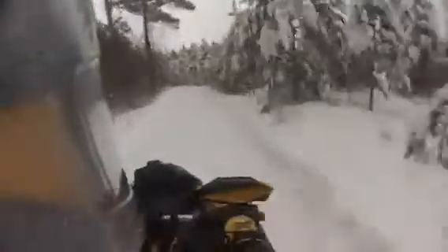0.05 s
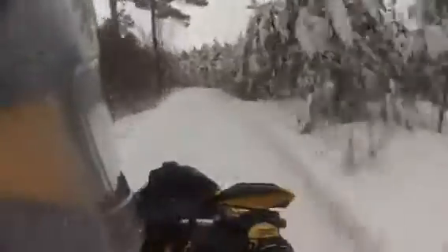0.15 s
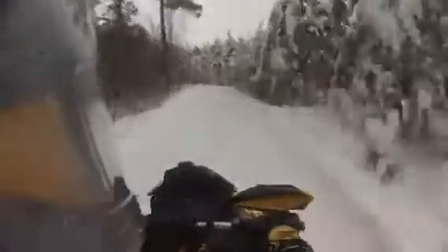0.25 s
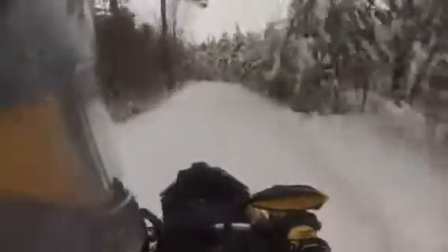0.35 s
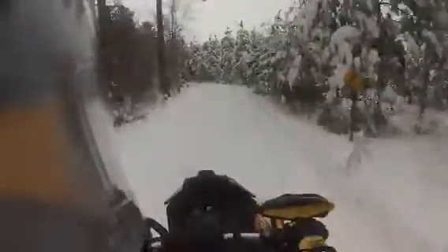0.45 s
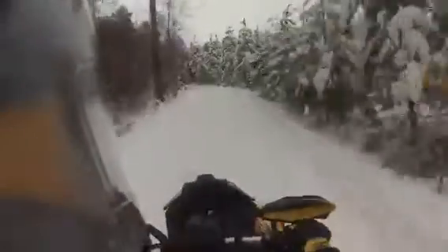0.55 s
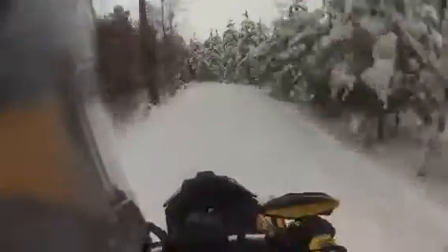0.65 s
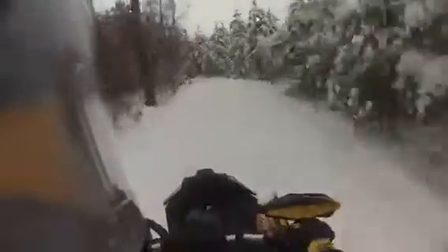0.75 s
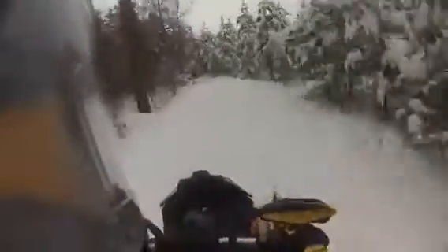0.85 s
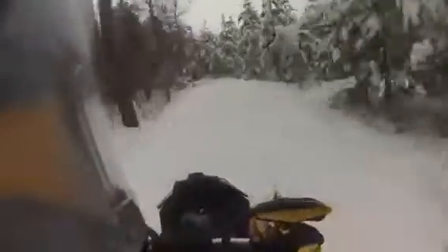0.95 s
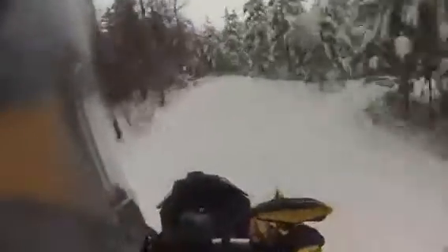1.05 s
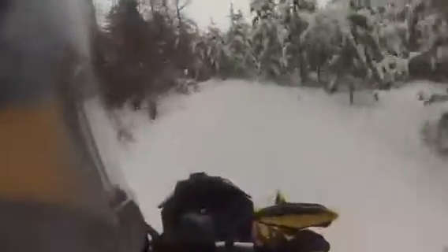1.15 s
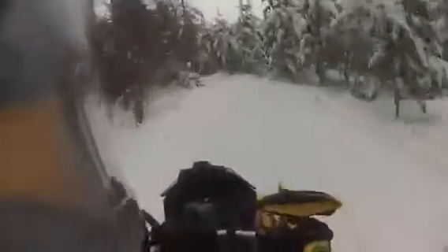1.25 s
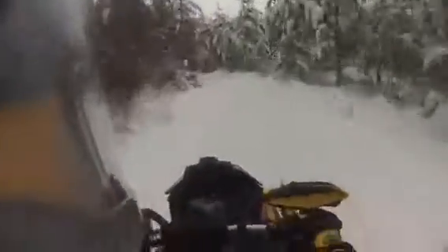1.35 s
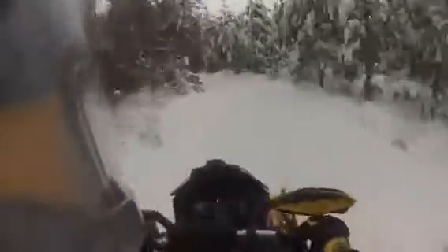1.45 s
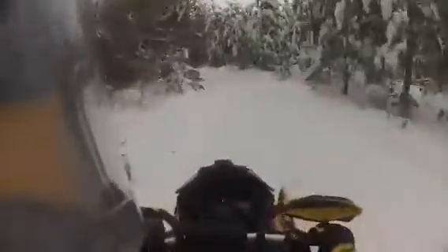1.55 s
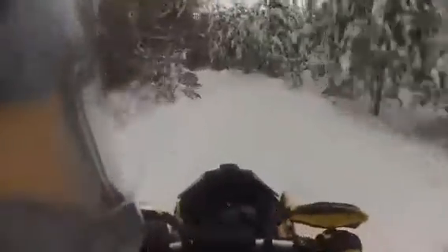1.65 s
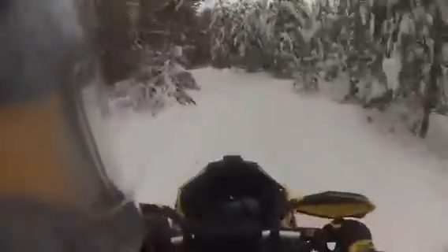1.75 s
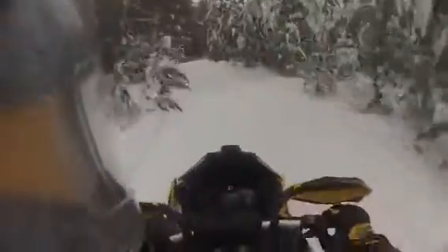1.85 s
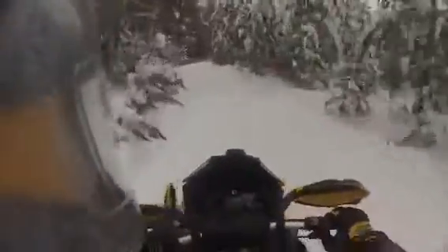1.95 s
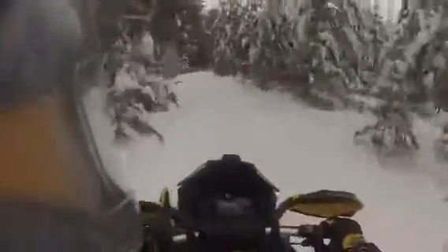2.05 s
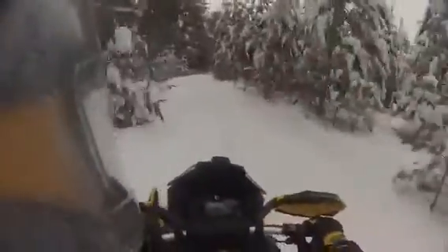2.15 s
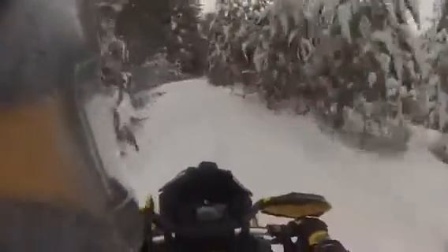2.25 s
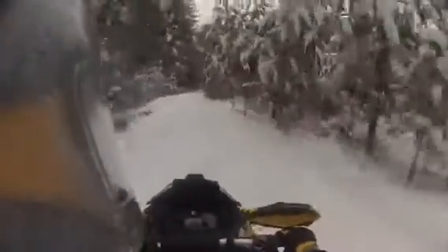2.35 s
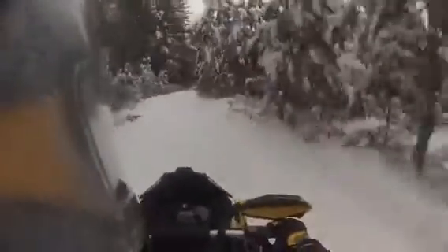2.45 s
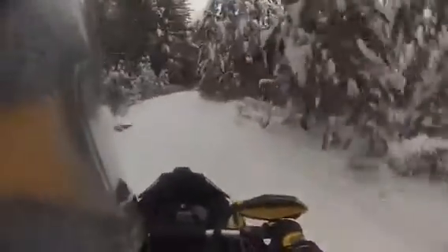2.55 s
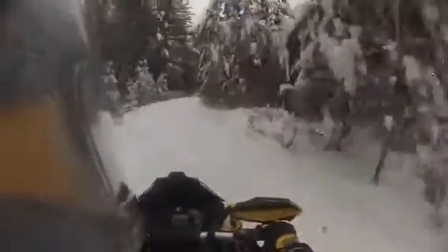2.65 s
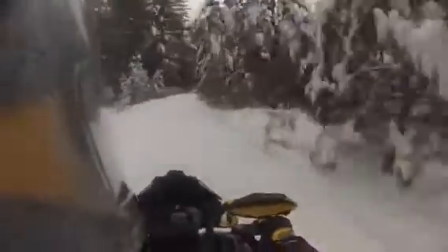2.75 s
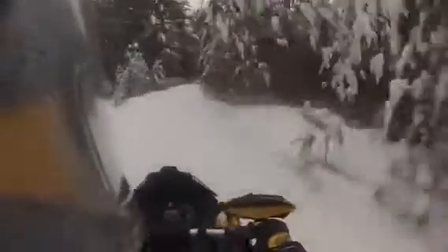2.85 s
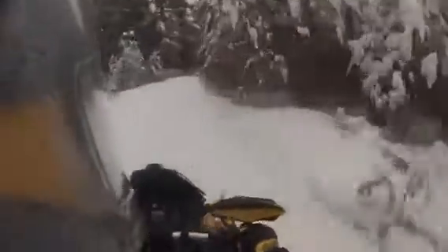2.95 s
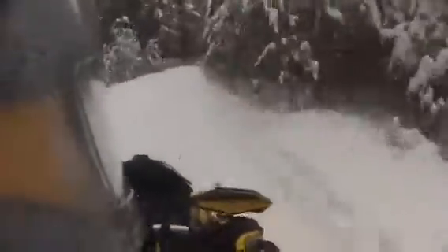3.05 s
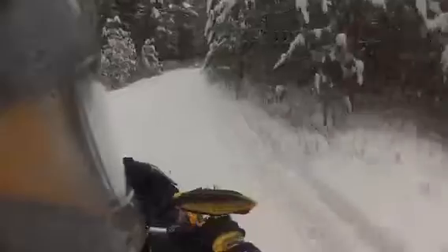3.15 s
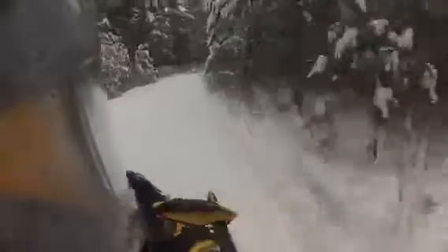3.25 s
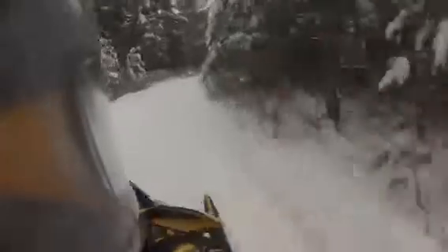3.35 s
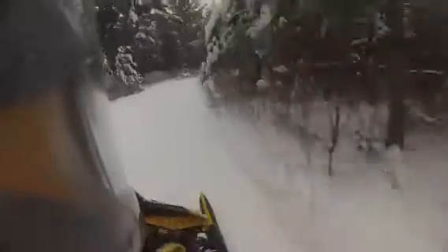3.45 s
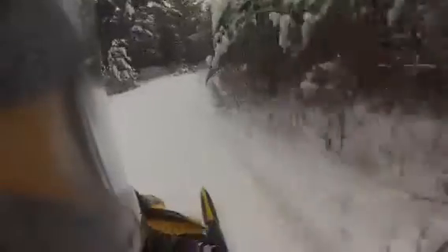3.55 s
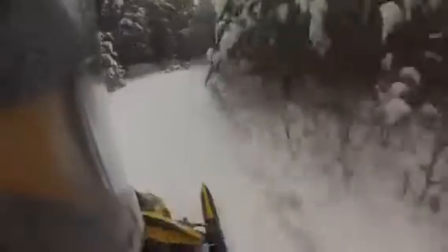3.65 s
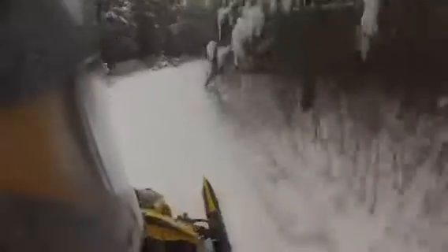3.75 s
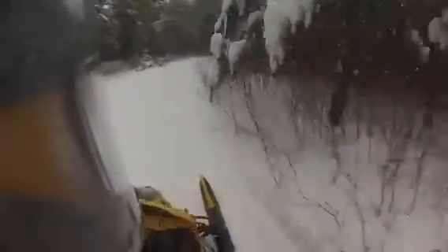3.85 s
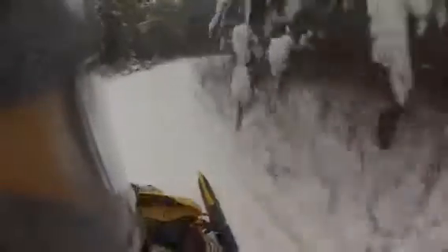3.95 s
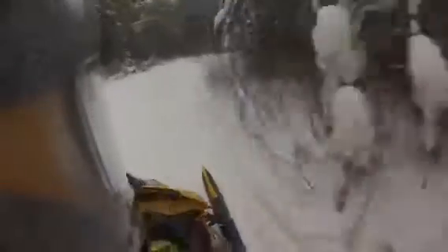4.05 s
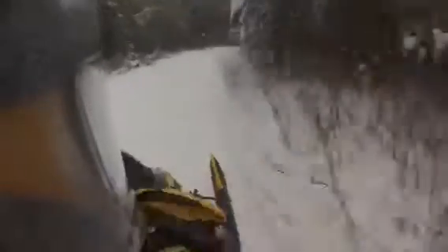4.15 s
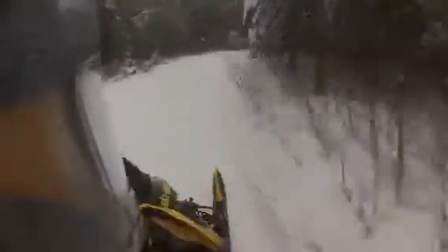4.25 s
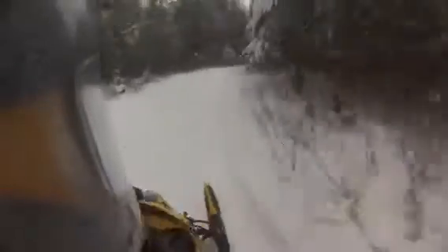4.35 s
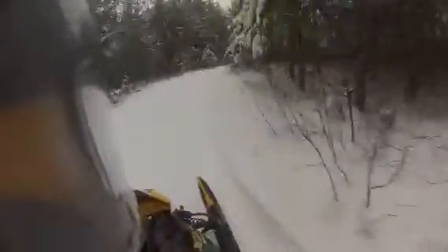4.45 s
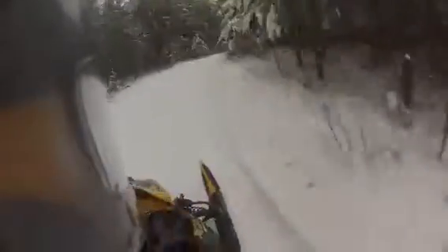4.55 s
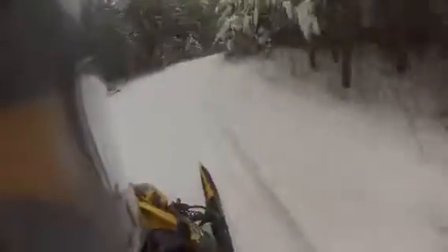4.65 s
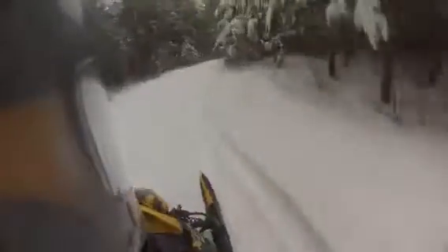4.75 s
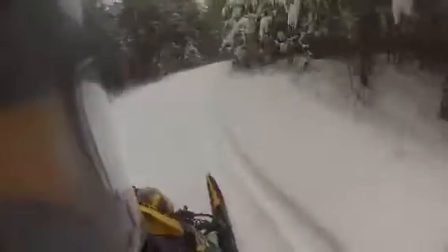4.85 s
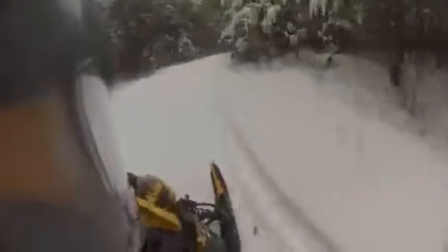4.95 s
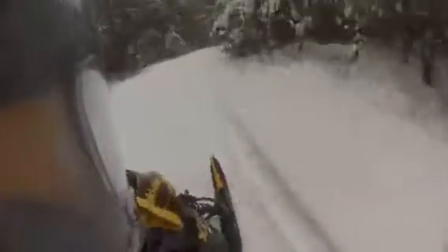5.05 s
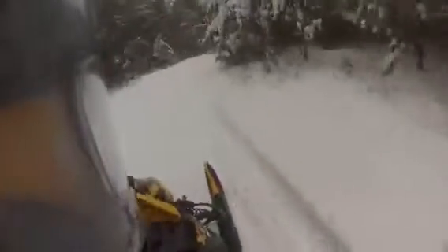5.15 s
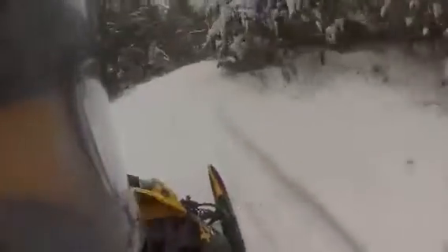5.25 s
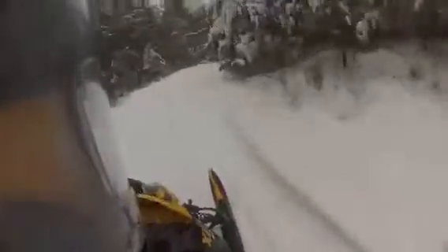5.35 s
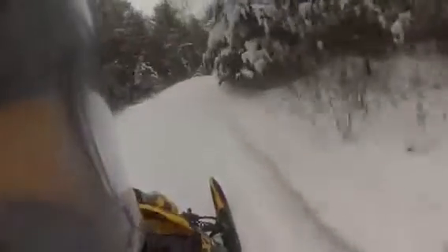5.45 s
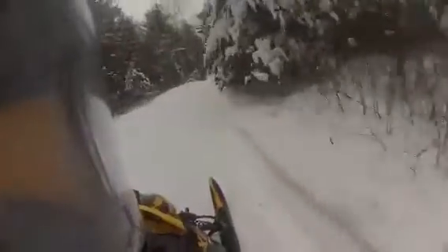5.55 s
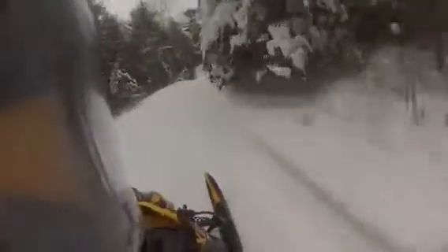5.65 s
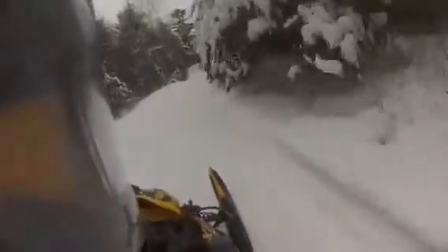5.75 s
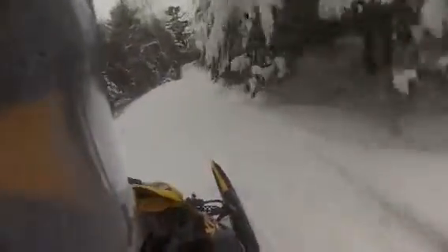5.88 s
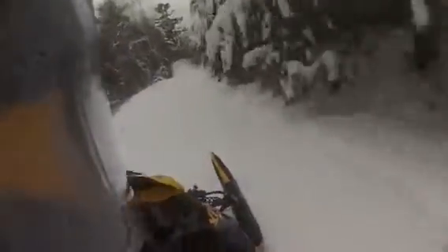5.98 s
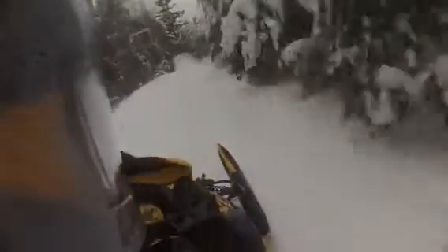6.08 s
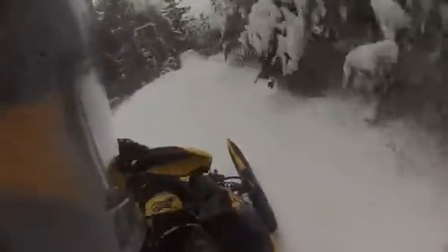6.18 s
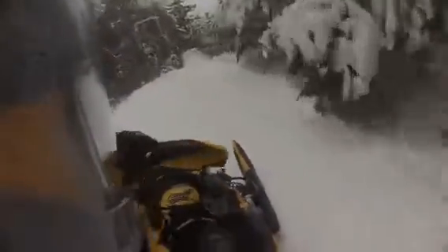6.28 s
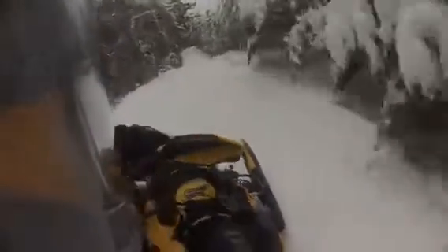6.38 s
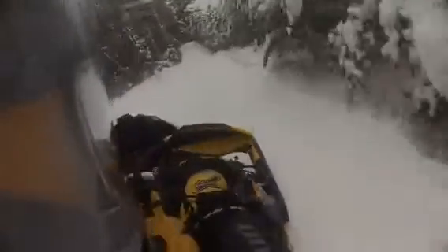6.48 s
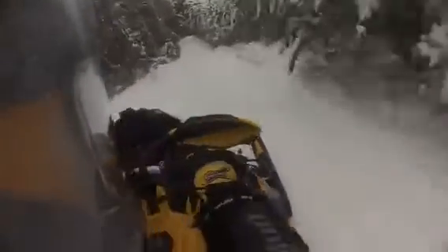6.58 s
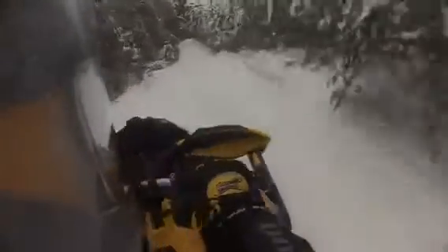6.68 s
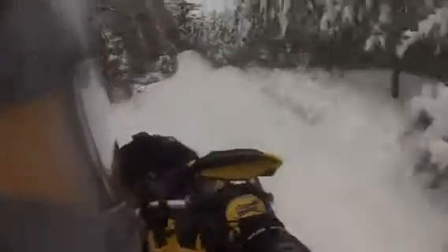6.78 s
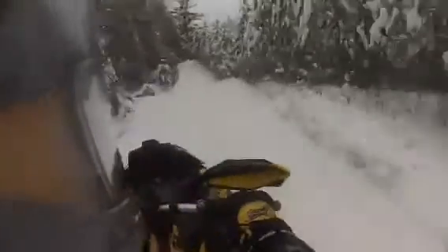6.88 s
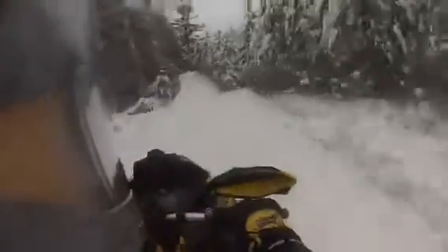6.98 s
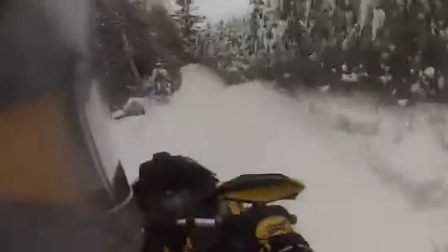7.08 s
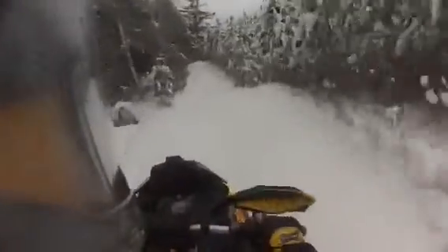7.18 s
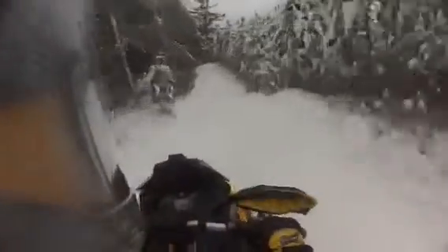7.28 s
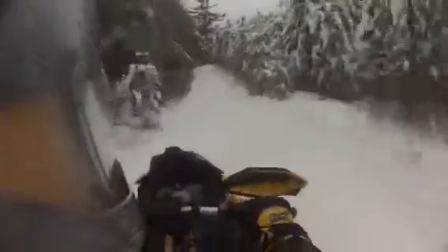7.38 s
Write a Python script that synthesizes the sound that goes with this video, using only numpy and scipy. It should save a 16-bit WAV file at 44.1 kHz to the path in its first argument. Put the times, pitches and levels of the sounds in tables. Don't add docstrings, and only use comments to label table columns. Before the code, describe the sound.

A helmet microphone in a closed housing rides a two-stroke snowmobile along a snowy trail. Three hard, low wind thumps hit at 0.1, 0.35 and 0.5 s, the second making everything duck sharply. Beneath lie rumbling buffeting, a mid-range gas and clutch roar, a wavering track hum, bright snow hiss and an airy whistle. A softer blow comes at 1.3 s. From 1.6 s a rough low engine tone fades in, rising slightly near 2.4 s, then sagging as speed, hiss and wind fall until about 4.8 s. A slight rev lifts around 4.4 s; sparse tiny ice ticks sound throughout. From 5.1 s the throttle opens: a raspy, nasal bark climbs in surges, strongest from 6.2 s. Track hum and spray rise with it, wind thumps again at 6.9 s and faintly at 7.2 s, and it ends at 7.4 s still pulling.

```python
import sys
import numpy as np
from scipy import signal
from scipy.fft import rfft, irfft, next_fast_len
from scipy.io import wavfile
from scipy.ndimage import uniform_filter1d

SR = 44100
rng = np.random.default_rng(int(sys.argv[2]) if len(sys.argv) > 2 else 0)


def unload_audio(sound):
    columns = np.transpose(np.atleast_2d(sound))
    steps = np.round(np.clip(columns, -1, 1) * 32767)
    wavfile.write(sys.argv[1], SR, steps.astype(np.int16))


def boost_factor(decibels):
    exponent = np.asarray(decibels, float) / 20
    return 10 ** exponent


N = 327222
TIME = np.arange(N) / SR
OPEN_DB = -33

# peak_s, change_db, half_length_s
SURGES = [(.22, 1.5, 0.063), (1.2, 0.5, .08), (2.3, 0.5, 0.077), (3.3, 0, 0.096), (3.8, -1, 0.12),
          (4.35, 1.5, 0.093), (5.2, -5, .06), (5.45, 2, .1), (6.05, 4, .1), (6.27, 1.5, 0.056),
          (6.52, 2, .17), (7.1, -1, 0.11), (7.35, 2, .08)]
# peak_s, peak_db, gain_dip_db
BLOWS = [
    (0.112, -8, -1),
    (0.354, -6, -12),
    (.530, -9.5, -7.5),
    (1.300, -18, -6),
    (6.860, -9, -7),
    (7.215, -19, -4),
]


def curves(table):
    s, *columns = np.transpose(table)
    return [np.interp(TIME, s, column) for column in columns]


def bumps(rows):
    return sum(db * np.exp(-((TIME - s) / half) ** 2) for s, db, half in rows)


def unit(x):
    return x / np.sqrt(np.mean(x ** 2))


def walk(rate):
    hold = int(SR / rate)
    steps = np.repeat(rng.standard_normal(N // hold + 1), hold)
    return 1.3 * uniform_filter1d(uniform_filter1d(steps, hold), hold)[:N]


def noise():
    return rng.standard_normal(N)


def colour(x, points):
    hz, db = np.transpose(points)
    size = next_fast_len(N)
    log_hz = np.log(np.arange(size // 2 + 1) * SR / size + 1e-3)
    gain = boost_factor(np.interp(log_hz, np.log(hz), db, -90, -90))
    return unit(irfft(rfft(x, size) * gain, size)[:N])


def engine(turns, hz, firing_db, bark_db):
    # centre_hz, width_hz, level_db
    pipe = [(471, 23, -5), (660, 280, -8.5), (712, 150, -20), (836, 66, -17.5), (950, 29, -23),
            (1010, 23, -13), (1170, 48, 1), (1193, 108, -2.5), (1363, 26, -3.5), (1420, 20, -4),
            (1734, 47, -4.5), (1870, 29, -6), (1992, 71, -13), (2900, 77, -43)]
    # pitch_hz, level_db
    muffler = [(250, -40.5), (365, -33), (400, -47), (422, -44), (450, -50), (485, -36.5), (525, -38.5),
               (552, -54),
               (595, -42.5), (635, -42), (710, -58), (850, -46), (1050, -54), (1150, -38.5),
                    (1215, -37), (1280, -43)]
    harmonics = (1, 2, 3, 4, 6)
    overtone_db = (-0.1, -0.2, -4, -2.6)
    split_hz = 1600
    hood_hz, hood_width_hz, hood_db = 844, 500, -12.5

    rough = 1 + 0.1369 * np.clip(OPEN_DB - bark_db, 0, 15)
    lift_db = 1 + 1.1 * bumps(SURGES)[::64]
    timing = turns + 0.0033 * rough * walk(18)
    bark = 0
    for order in range(5, 30):
        f = order * hz[::64]
        ring = boost_factor(hood_db) / (1 + 2j * (f - hood_hz) / hood_width_hz)
        for m, (centre, width, db) in enumerate(pipe):
            level = boost_factor(db + lift_db * (centre > split_hz))
            ring = ring + (-1) ** m * level / (1 + 2j * (f - centre) / width)
        share = (order / 2 not in harmonics) * boost_factor(1.5 * walk(4) + 1.6 * walk(22))
        spin = np.exp(2j * np.pi * order * timing + 0.4j * walk(10))
        bark = bark + share * np.imag(np.repeat(ring, 64)[:N] * spin)

    firing = 4 * np.pi * turns + 0.06 * rough * walk(6.8)
    pass_hz, pass_db = np.transpose(muffler)
    tones_db = [firing_db]
    for k, db in zip(harmonics[1:], overtone_db):
        tones_db.append(np.interp(2 * k * hz, pass_hz, pass_db) + db + bark_db - OPEN_DB)
    tone = 0
    for k, db in zip(harmonics, tones_db):
        tone = tone + boost_factor(db + 1.51 * rough * walk(15)) * np.sin(k * firing)
    fade_in = np.clip((TIME - 1.55) / 0.19, 0, 1)
    return fade_in * (np.sqrt(2) * tone + boost_factor(bark_db) * bark)


def roar(turns, roar_db):
    # pitch_hz, density_db
    roar_colour = [(320, -5), (540, -5), (600, -5), (653, 3.5), (696, -8), (741, -7.5), (996, -1),
                   (1080, -3), (1320, 2.5), (1480, 0), (1800, 3), (2010, 0), (2300, -11.5), (2760, -14.5),
                   (2900, -55), (3770, -78), (6380, -120)]
    pulse = 1 + 0.081 * np.cos(4 * np.pi * turns)
    return boost_factor(roar_db + 0.19 * walk(14)) * colour(noise() * pulse, roar_colour)


def track(hz, hum_db, throttle_db):
    # pitch_hz, level_db
    tunnel = [(225, -48), (255, -41), (290, -50), (325, -36), (360, -35.5), (400, -36.5), (470, -36)]
    phase = 2 * np.pi * np.cumsum(hz) / SR + 0.93 * walk(16)
    hum = boost_factor(hum_db + 3.8 * walk(14)) * np.sin(phase)
    octave_db = np.interp(2 * hz, *np.transpose(tunnel)) + 0.33 * (throttle_db - OPEN_DB)
    return hum + boost_factor(octave_db + 3.0 * walk(8)) * np.sin(2 * phase)


def hiss(snow_db, throttle_db):
    # pitch_hz, density_db
    snow_colour = [(1650, -6.5), (2800, 3.5), (3050, -1), (3520, 2), (4160, -6), (4570, -3), (5600, -5.5),
                   (6430, -5.5), (7200, -5), (8200, -19), (10700, -48), (18000, -120)]
    whistle_colour = [(4800, -37), (5200, -2), (5500, 10.5), (5850, 7), (6300, -24)]
    fan_colour = [(4200, -14), (4600, -3), (5100, -6), (6500, -8), (7400, -28)]
    air_colour = [(6500, -32), (8000, -3), (9000, -4.5), (10100, -5), (10600, -2.5), (11300, 1.5),
                  (11900, -3.5), (12400, -5), (13200, -16), (16000, -40)]
    air_top_colour = [(11500, -30), (12300, -7), (14000, -6), (15100, -12), (15200, -43)]
    # time_s, whistle_minus_snow_db
    rim = [
        (0, -4.5),
        (1, -6),
        (1.9, -4.5),
        (2.5, -9.5),
        (3.3, -5),
        (3.55, -14),
        (4.2, -13),
        (6.3, -28),
        (6.7, -12),
        (7.42, -5),
    ]
    # peak_s, change_db, half_length_s
    puffs = [(.25, 1, 0.11), (.5, 1.5, .05), (3.1, -1.5, 0.16), (3.4, 1.5, 0.043), (4.15, -2, 0.1),
             (4.36, 1.5, .08), (5.05, -1.5, 0.089), (5.25, 0.5, .06), (6.1, 0, .06), (6.72, 0, .1),
             (7.19, 1.5, 0.016)]

    whistle_db, = curves(rim)
    slow_throttle_db = uniform_filter1d(throttle_db, SR // 3)
    fan_db = -4.5 + 1.3 * np.minimum(slow_throttle_db - OPEN_DB, 0)
    puff_db = bumps(puffs)
    flicker_db = puff_db + 0.32 * walk(12) + 0.47 * walk(45)
    grit = noise() * boost_factor(2.0 * rng.exponential(size=N))
    snow = colour(noise(), snow_colour) + boost_factor(whistle_db) * colour(noise(), whistle_colour)
    snow = snow + boost_factor(fan_db) * colour(noise(), fan_colour)
    air = boost_factor(-14) * colour(grit, air_colour)
    air = air + boost_factor(-14 + 0.61 * whistle_db) * colour(grit, air_top_colour)
    return boost_factor(snow_db + flicker_db) * (snow + boost_factor(1.3 * puff_db) * air)


def wind(headwind_db, flutter_db):
    # pitch_hz, density_db
    buffet_colour = [(4.7, -33), (8.0, 2), (27, 1), (70, 3), (114, -4), (161, -6), (200, -13), (260, -38),
                     (440, -120)]
    flutter_colour = [(120, -61), (200, -2.5), (243, -3.5), (320, -9), (360, -6), (395, -14.5),
                      (560, -24.5), (730, -60)]
    # peak_s, change_db, half_length_s
    gusts = [(0, 3.5, 0.038), (.14, -6, 0.025), (1.284, 2, .04), (1.67, -4, 0.03), (1.773, -1, .03),
             (1.815, -1, 0.016), (1.852, -7, 0.015), (2.083, -5, 0.062), (2.15, 3, .03), (2.21, -3, 0.063),
             (2.483, 1, 0.097), (2.766, -7, 0.016), (2.962, 2, 0.036), (3.062, -7, 0.032),
             (3.84, -1, 0.027), (4.425, -1, 0.038), (4.92, 5.5, 0.045), (5.038, -4, 0.034),
             (5.097, 9, 0.024), (5.41, 3, 0.013), (5.923, 4, 0.034), (6.127, -4, 0.047), (6.2, 3, 0.034),
             (6.62, 4.5, .05), (6.985, 1, 0.03), (7.174, -5, 0.018), (7.208, 6.5, .02), (7.253, -7, 0.054),
             (7.33, 2, 0.12)]
    gust_db = headwind_db + bumps(gusts)
    buffeting = boost_factor(gust_db + 1.0 * walk(14)) * colour(noise(), buffet_colour)
    return buffeting + boost_factor(flutter_db + 0.89 * walk(14)) * colour(noise(), flutter_colour)


def blows():
    return sum(boost_factor(db) * np.exp(-((TIME - s) / 0.0086) ** 2) for s, db, _ in BLOWS)


def grains():
    # start_s, peak_db, centre_hz
    ice = [(1.2022, -38, 12900), (3.2688, -51, 11000), (3.3446, -52, 9000), (3.4096, -43, 10900),
           (3.7584, -47, 11000), (4.2984, -56, 11500), (4.6937, -53, 11260), (5.3113, -46, 10710),
           (5.6046, -38, 11900), (5.7184, -52, 11030), (6.5715, -43, 11500)]
    out, t = np.zeros(N), np.arange(200) / SR
    bright = signal.butter(2, 6000, "high", fs=SR, output="sos")
    for s, db, hz in ice:
        strike = np.sin(2 * np.pi * hz * t) + 0.72 * rng.standard_normal(200)
        tick = signal.sosfilt(bright, np.exp(-t / 0.001) * strike)
        start = int(s * SR) + 30
        out[start:start + 200] += boost_factor(db + 3.0) * tick / np.abs(tick).max()
    return out


def scene():
    # time_s, crank_hz, firing_db, throttle_db
    engine_ride = [(1.7, 68.8, -25.5, -48.5), (2.45, 76.5, -37, -39), (2.9, 69.5, -30, -51.5),
                   (3.7, 61.1, -38, -47), (3.9, 65, -23.5, -45.5), (4.28, 70.35, -29.5, -43.5),
                   (4.46, 78.1, -32.5, -41.5), (5.1, 74.1, -51, -42), (5.2, 78.8, -35, -34.5),
                   (5.38, 87.8, -35.5, -37.5), (5.6, 92, -32.5, -37), (5.93, 93.0, -31.5, -34.5),
                   (6.29, 101.3, -25.5, -30.5), (6.59, 97.8, -23, -30.5), (6.82, 106.5, -28, -29.5),
                   (6.95, 103.6, -21, -32), (7.21, 106.8, -29, -34.5), (7.42, 106.7, -21.5, -28.5)]
    # time_s, lug_hz, hum_db, spray_db, headwind_db
    travel = [(0, 216.8, -40, -42, -14), (.3, 212.8, -30.5, -42, -15), (.65, 205.1, -21.5, -45, -15),
              (1.05, 179.9, -25, -44.5, -16.5), (1.6, 168, -25.5, -46.5, -17.5),
              (2.0, 164.6, -26.5, -47, -17), (2.8, 151.2, -29.5, -49, -18), (3.2, 141, -37, -51, -17.5),
              (3.7, 125.4, -43, -55.5, -23.5), (4.2, 116.8, -35.5, -56, -26), (4.8, 113.5, -26, -55, -23.5),
              (5.2, 120, -27.5, -53.5, -26), (5.9, 138.6, -27.5, -51.5, -27.5),
              (6.3, 160.3, -32.5, -50, -21), (6.55, 166.5, -31, -46, -22), (6.8, 201.2, -28, -43, -14.5),
              (7.25, 237.7, -29.5, -42, -16), (7.42, 231, -31, -39, -16)]
    cruise_db, load_from_db = -43, -40

    hz, firing_db, throttle_db = curves(engine_ride)
    lug_hz, hum_db, spray_db, headwind_db = curves(travel)
    turns = np.cumsum(hz) / SR
    load_db = np.maximum(uniform_filter1d(throttle_db, SR // 4) - load_from_db, 0)
    speed_db = spray_db - cruise_db
    flutter_db = -26.5 + speed_db - 0.23 * load_db
    roar_db = -33.5 + 0.75 * speed_db + 0.25 * load_db + bumps(SURGES)

    machine = engine(turns, hz, firing_db, throttle_db) + roar(turns, roar_db)
    machine = machine + track(lug_hz, hum_db, throttle_db)
    weather = wind(headwind_db, flutter_db) + blows()
    return (machine + hiss(spray_db, throttle_db) + weather + grains())[None]


def roll_off(x):
    return signal.sosfilt(signal.butter(12, 15190, fs=SR, output="sos"), x)


def record(dry):
    dip_db = 0
    for s, _, db in BLOWS:
        late = np.clip(TIME - s - 0.004, 0, None)
        dip_db = dip_db + db * (1 - np.exp(-late / 0.0021)) * np.exp(-late / 0.029)
    held = 0.79 * np.tanh(dry * boost_factor(dip_db) / 0.8)
    top_cut = signal.ellip(10, 0.2, 70, 15300, fs=SR, output="sos")
    return roll_off(signal.sosfilt(top_cut, held))


dry = scene()
out = record(dry)
unload_audio(out)
```